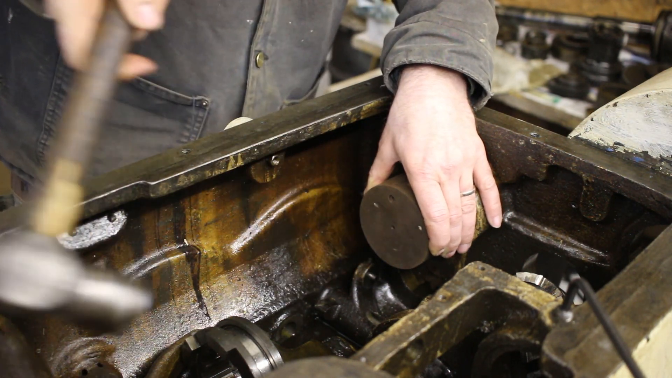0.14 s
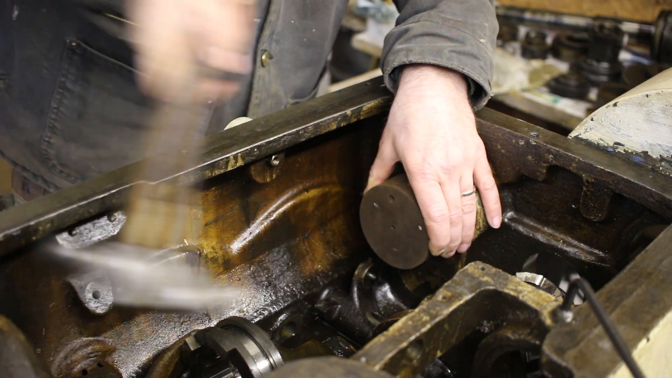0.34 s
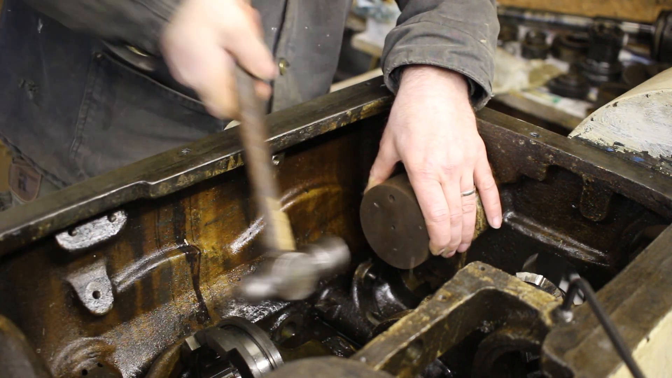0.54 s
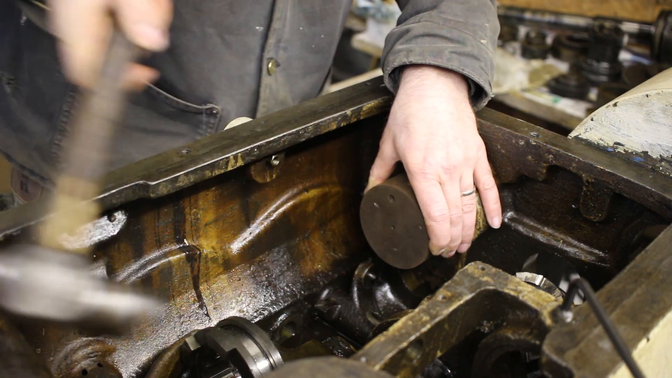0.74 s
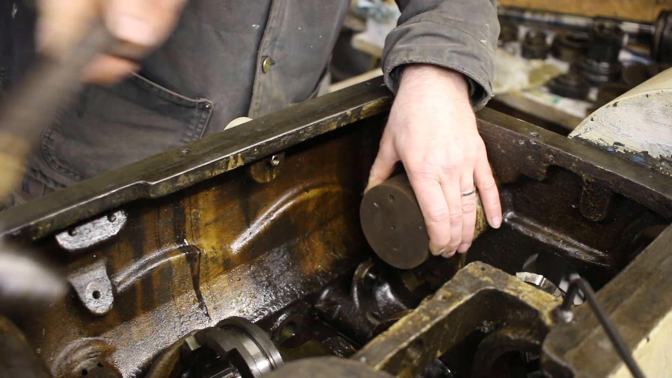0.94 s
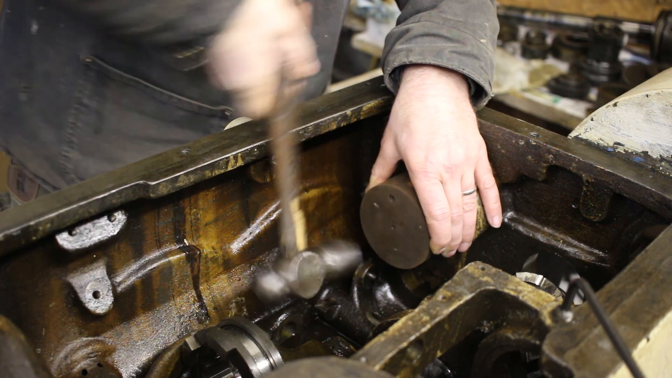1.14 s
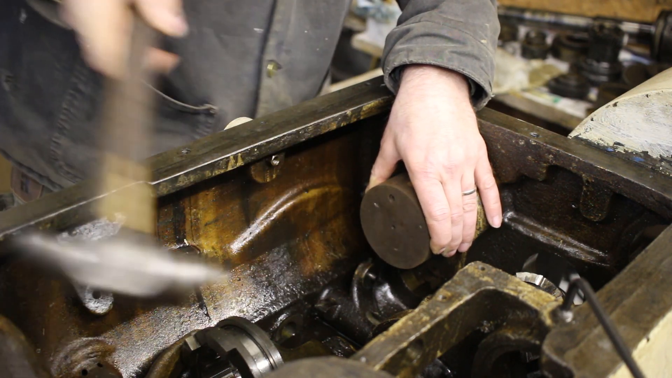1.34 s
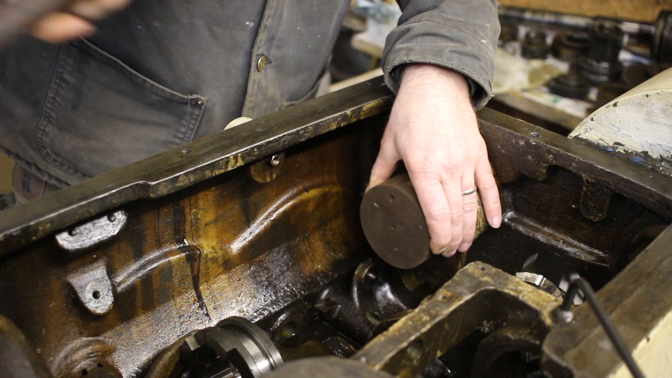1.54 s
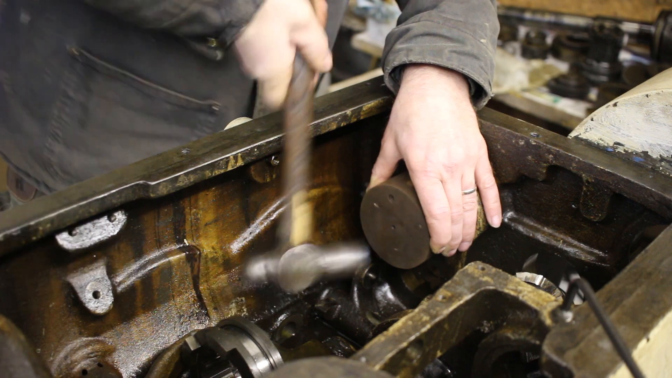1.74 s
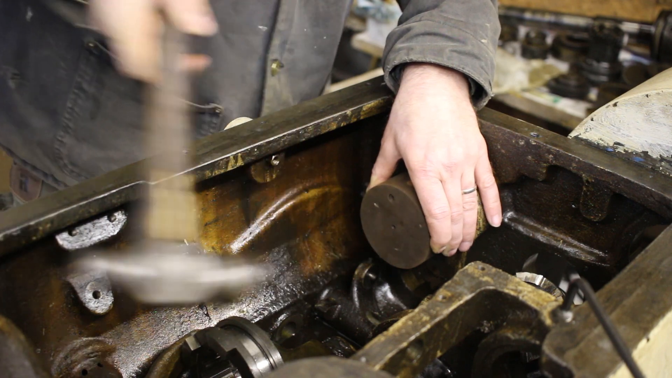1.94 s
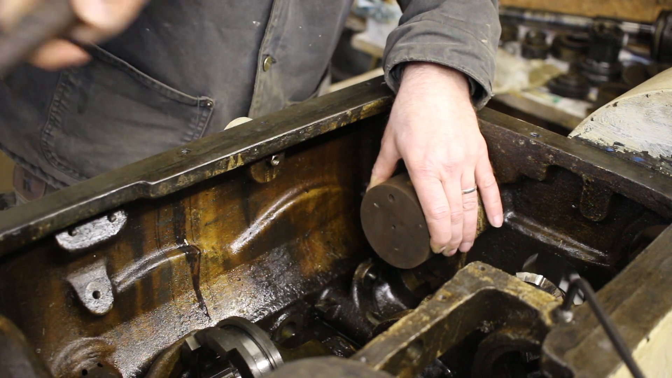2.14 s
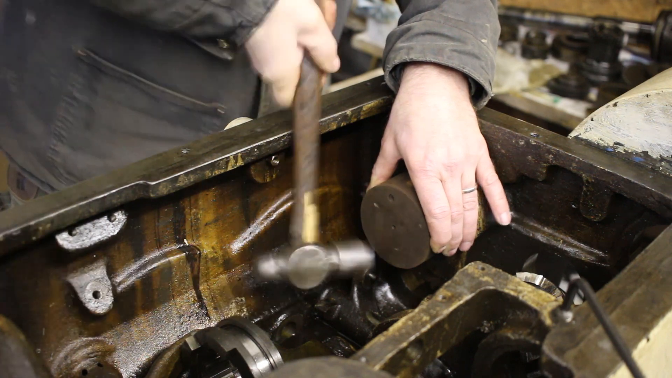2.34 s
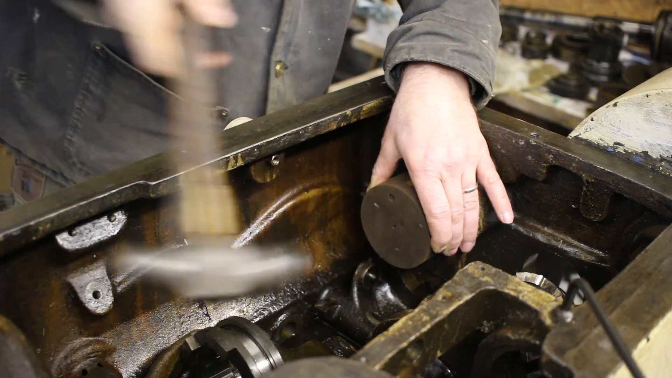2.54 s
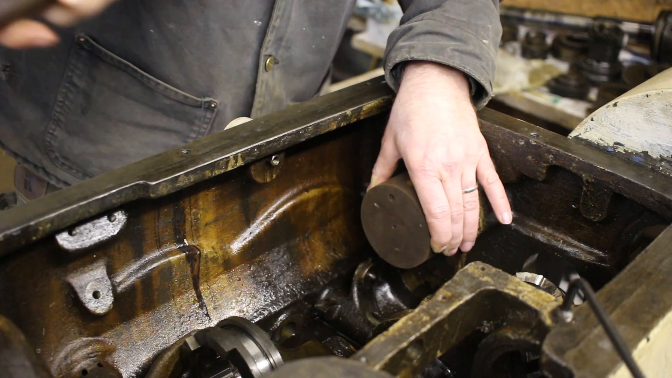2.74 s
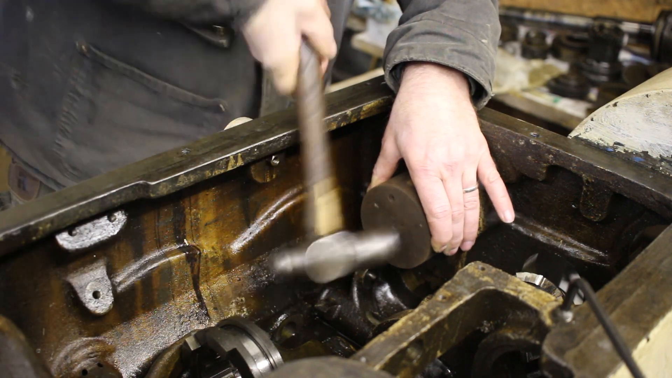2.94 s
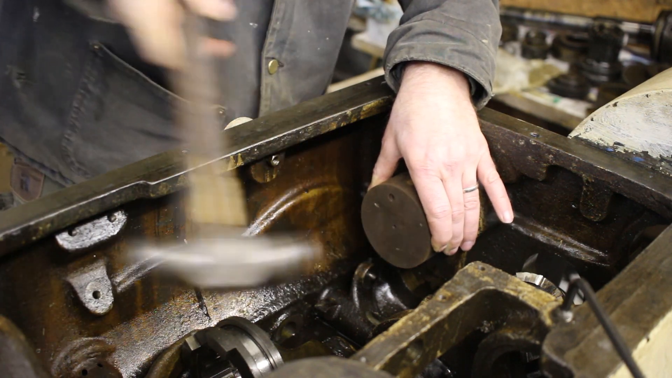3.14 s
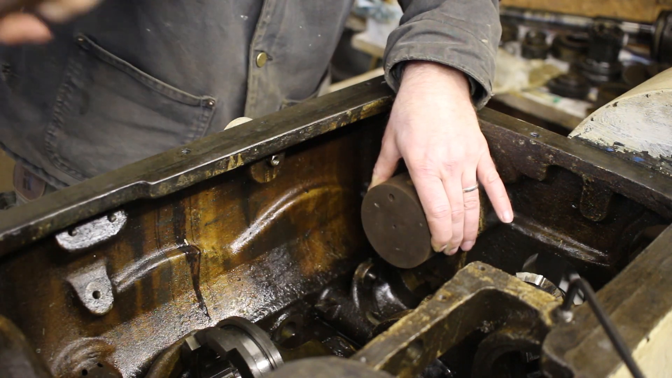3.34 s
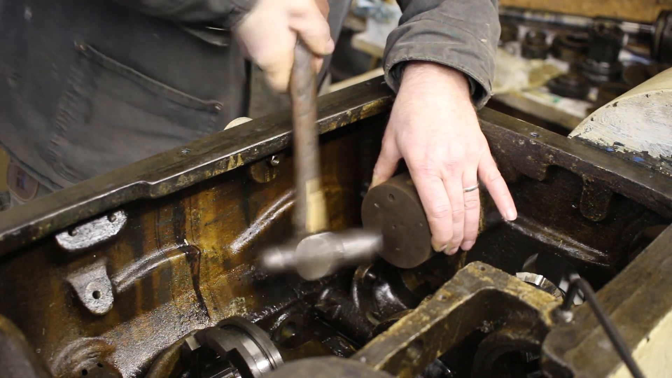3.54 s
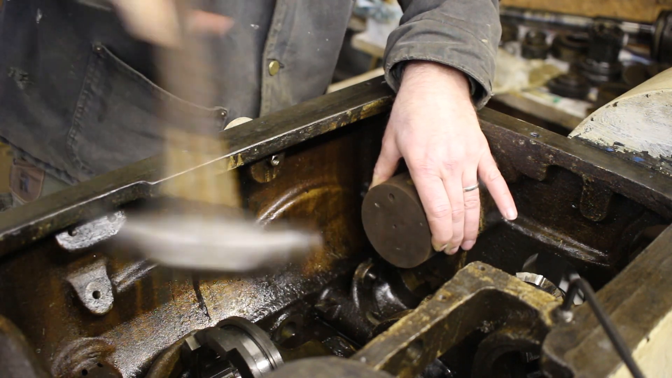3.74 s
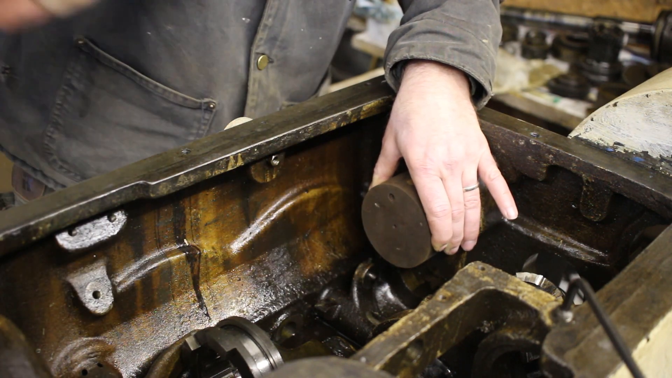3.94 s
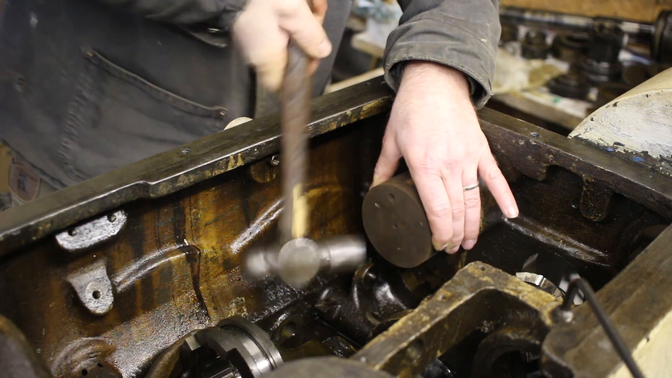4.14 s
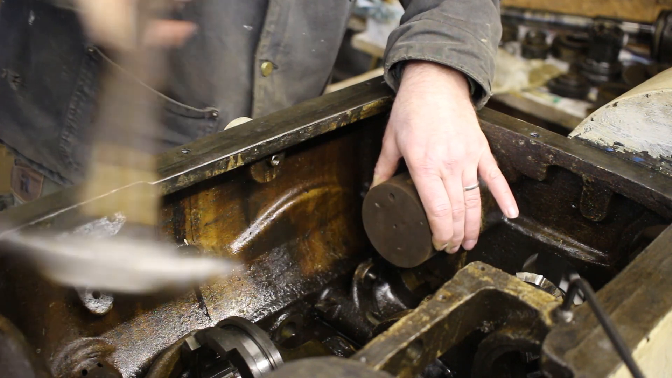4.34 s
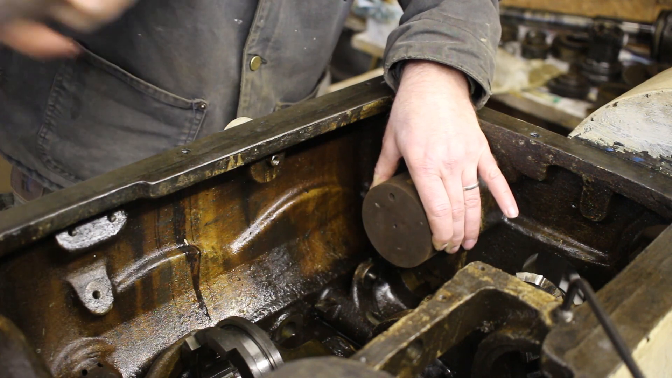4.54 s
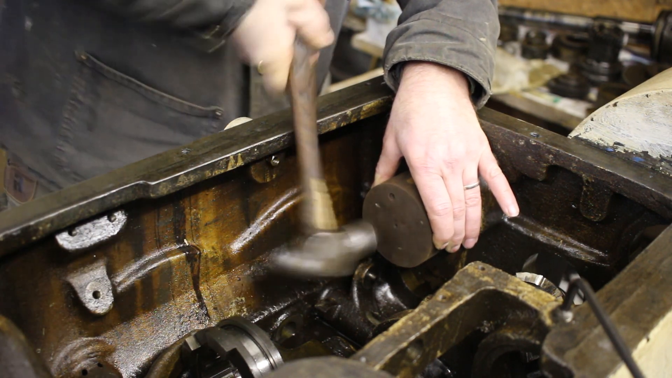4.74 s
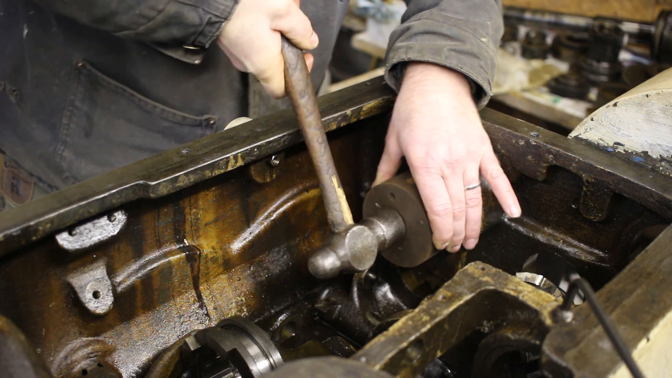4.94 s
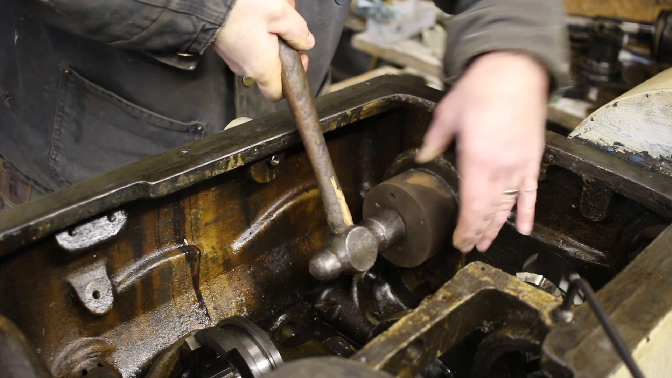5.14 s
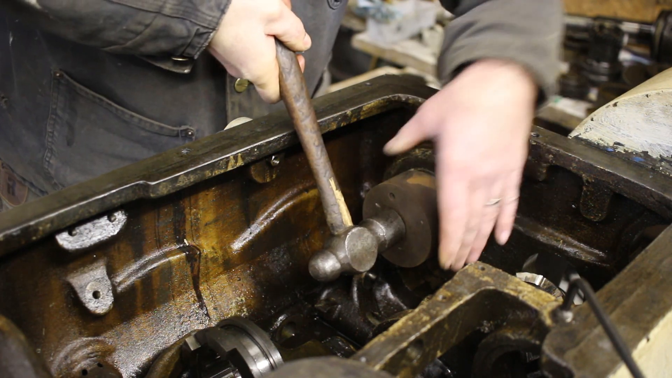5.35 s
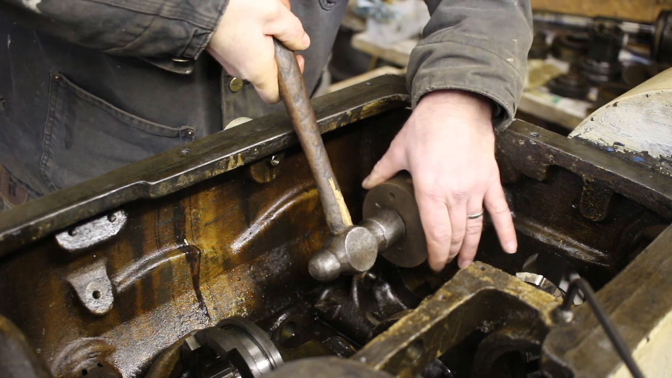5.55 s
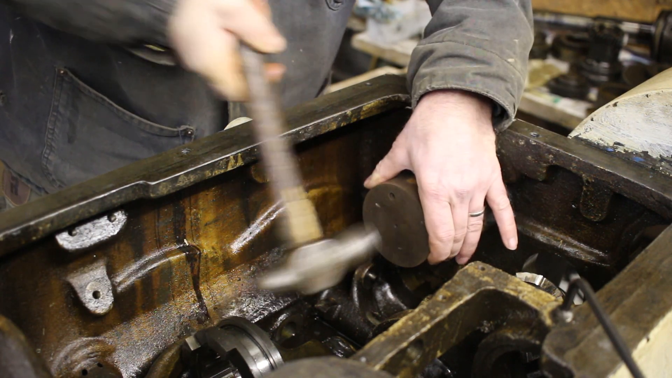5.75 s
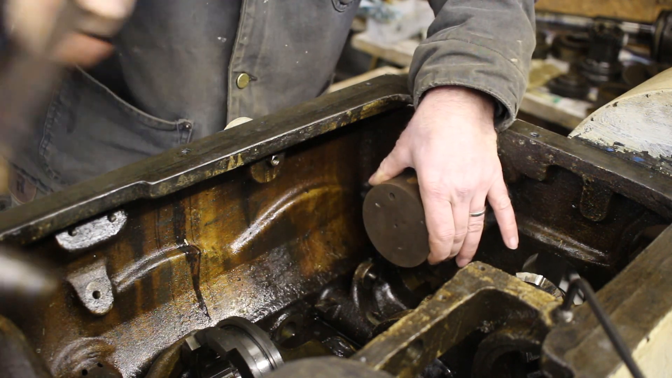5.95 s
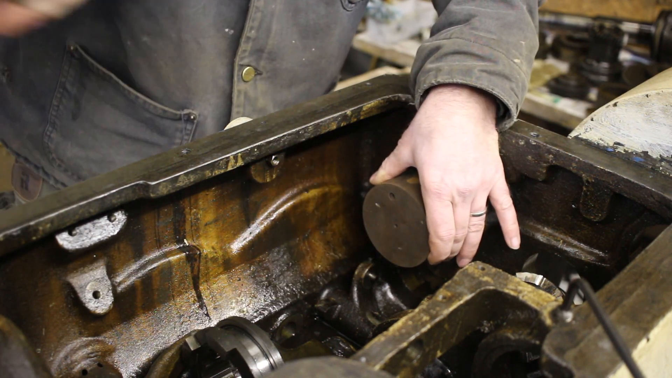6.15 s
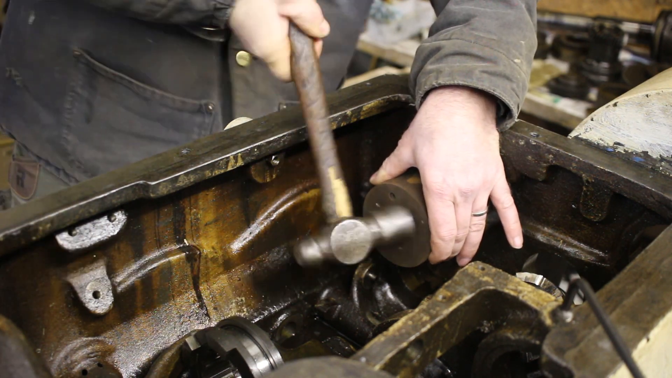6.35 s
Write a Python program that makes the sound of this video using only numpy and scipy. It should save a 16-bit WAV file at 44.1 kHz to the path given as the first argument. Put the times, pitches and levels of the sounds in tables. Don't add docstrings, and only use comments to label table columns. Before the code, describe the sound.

Evenly spaced hammer clanks ring through an iron housing with long room tails, followed by light bounces, a quiet pause and a final blow.

```python
import sys
import numpy as np
from scipy import signal
from scipy.fft import rfft, irfft, next_fast_len
from scipy.io import wavfile
from scipy.ndimage import uniform_filter1d, map_coordinates

SR = 44100
rng = np.random.default_rng(int(sys.argv[2]) if len(sys.argv) > 2 else 0)


def materialize(psi):
    bounded = np.clip(np.atleast_2d(psi).T, -1, 1)
    quanta = np.round(bounded * 32767).astype(np.int16)
    wavfile.write(sys.argv[1], SR, quanta)


def linear_from_db(decibels):
    return 10 ** (np.asarray(decibels, float) / 20)


N = 281799
LEAD = SR // 2
TAIL = 3 * SR // 2


def noise(n):
    return rng.standard_normal(n)


def unit(x):
    return x / np.sqrt(np.mean(x ** 2) + 1e-20)


def along(points, hz):
    f, value = np.transpose(points)
    return np.interp(np.log(hz + 1), np.log(f + 1), value)


def filtered(x, response):
    m = next_fast_len(len(x) + 8192)
    return irfft(rfft(x, m) * response(np.fft.rfftfreq(m, 1 / SR)), m)[:len(x)]


def coloured(n, spectrum):
    return filtered(noise(n), lambda f: linear_from_db(along(spectrum, f)))


def resonance(f, hz, width):
    return 1j * f * width / (hz * hz - f * f + 1j * f * width)


def low_pass(f, hz):
    return 1 / (1 + (f / hz) ** 6)


def ring(hz, t60, t):
    return linear_from_db(-60 * t / t60) * np.sin(2 * np.pi * (hz * t + rng.random()))


def rise(t, seconds):
    return 1 - np.exp(-t / seconds)


def wander(rate, t):
    return map_coordinates(noise(int(t[-1] * rate) + 4), [t * rate])


def silence():
    return np.zeros(LEAD + N + TAIL)


def add(track, s, sound):
    track[LEAD + round(s * SR):][:len(sound)] += sound


def trimmed(track):
    return track[LEAD:LEAD + N]


# (frequency [Hz], level [dB])
LAMP_LINES = [(118.4, -67.5), (360.7, -73), (479.1, -63.5), (597.5, -63.5), (721.4, -61), (839.8, -66.5),
              (958.2, -64), (1082, -61), (1200, -68), (1437, -75.5), (1561, -73), (2040, -77.5),
              (2159, -75.5), (2519, -76)]


def lamps():
    t = np.arange(N) / SR
    buzz = np.zeros(N)
    for hz, db in LAMP_LINES:
        harmonic = 120 * round(hz / 120)
        buzz += linear_from_db(db + 5) * np.sin(2 * np.pi * (harmonic * t + rng.random()))
    return buzz


# (frequency [Hz], level [dB per Hz])
AIR_COLOUR = [(25, -7.5), (50, -1.5), (120, -5), (500, -2.5), (700, -5), (1300, -8.5), (4000, -18),
              (9000, -26.5), (15700, -29)]


def room_air():
    return linear_from_db(-54) * unit(coloured(N, AIR_COLOUR))


# (frequency [Hz], level [dB per Hz])
TAIL_COLOUR = [(100, -33), (170, -14.5), (300, -9.5), (450, -7.5), (800, 0.5), (1200, -4.5), (2400, -8),
               (4000, -15), (6000, -21.5), (8000, -33), (10500, -40.5), (12000, -52), (14000, -66),
               (16000, -78.5)]
# (frequency [Hz], width [Hz], level over the tail [dB])
CASTING_MODES = [(482, 52, 7.5), (535, 25, 5.5), (595, 19, 4), (690, 5, 8), (798, 20, 4.5), (1054, 11, 7.5),
                 (1155, 30, 2.5), (1370, 12, 0), (1570, 20, 2), (1600, 99, 0), (2054, 24, 1),
                 (2380, 37, 1.5), (2680, 54, 2.5), (3690, 26, 4), (3770, 60, 4.5), (4160, 70, 0.5),
                 (9560, 300, 8)]
# (frequency [Hz], time to fall 60 dB [s])
TAIL_DECAY = [(60, 0.47), (200, 0.79), (700, .95), (2000, 0.82), (4500, .62), (8000, 0.39), (10000, 0.37),
              (12000, .3), (14000, 0.15), (16000, 0.2)]


def room_tail():
    def iron(f):
        modes = sum((linear_from_db(db) - 1) * resonance(f, hz, width) for hz, width, db in CASTING_MODES)
        return linear_from_db(along(TAIL_COLOUR, f)) * (1 + modes)

    hz, t, z = signal.stft(filtered(noise(TAIL), iron), SR, nperseg=256)
    early = 1 + linear_from_db(13.5 - 60 * t / 0.079)
    decay = linear_from_db(-60 * (t - 0.15) / along(TAIL_DECAY, hz)[:, None])
    fading = signal.istft(z * early * decay, SR, nperseg=256)[1][:TAIL]
    fading = fading * rise(np.arange(TAIL) / SR, 0.0066)
    return fading / np.sqrt(np.mean(fading[SR // 10:SR // 5] ** 2))


def clank(t, modes, damping, crack_db):
    body = np.zeros(len(t))
    for hz, width, db in modes:
        t60 = np.clip(damping * 6 / np.sqrt(width * hz / 40), 0.008, 0.2)
        build_up = 1 - np.exp(-t * (hz / 1000) ** 2 / 0.003)
        body += linear_from_db(db + 2 * rng.standard_normal()) * ring(hz, t60, t) * build_up
    crack = unit(filtered(noise(len(t)), lambda f: resonance(f, 2200, 990) + 0.16))
    crack = linear_from_db(crack_db - 60 * t / 0.028) * crack
    return (body + crack) * rise(t, 0.00012) / 3


# (frequency [Hz], level [dB], time to fall 60 dB [s])
HEAD_MODES = [(9080, -14, .15), (9530, -4, .2), (9800, -10, .2), (10020, -2, .14), (10110, -7, .3),
              (11500, -18, .14)]


def head_ring(t):
    head = np.zeros(len(t))
    for hz, db, t60 in HEAD_MODES:
        band = unit(filtered(noise(len(t)), lambda f: resonance(f, hz, 45)))
        head += linear_from_db(db + 2 * rng.standard_normal() - 60 * t / t60) * band
    return head * rise(t, 0.001)


# (frequency [Hz], level [dB], time to fall 60 dB [s])
PLATE_MODE = (202, -20.5, 0.77)


def plate_boom(t):
    hz, db, t60 = PLATE_MODE
    fade = np.cos(np.pi * t)
    return linear_from_db(db + rng.standard_normal()) * ring(hz, t60, t) * fade * rise(t, 0.012)


# (frequency [Hz], width [Hz], level [dB])
DRIFT_MODES = [(444, 110, -7.5), (577, 56, -6), (811, 100, -14.5), (1013, 180, -18), (1392, 120, -2),
               (1597, 150, -5.5), (1745, 100, -10.5), (2053, 68, -1.5), (2353, 84, 1.5), (2707, 170, 1.5),
               (3487, 90, -5), (3800, 85, -7.5), (4092, 81, -2), (5100, 140, -7), (5426, 180, -2),
               (5865, 59, -10), (6120, 100, -5.5), (6760, 600, -13), (9000, 150, -22.5), (10054, 110, 2.5)]
# (time [s], peak [dB], tail [dB], head ring [dB], gain drop [dB])
BLOWS = [
    (0.489, 7.5, -1, -7, 19),
    (1.154, 5, 0, 1.5, 19.5),
    (1.781, 6, -0.5, 3.5, 19),
    (2.381, 4, 0, 3, 18),
    (2.996, 1.5, 5, 8, 19),
    (3.595, 3, 2, 3.5, 18.5),
    (4.177, 3.5, 3.5, 10, 20.5),
    (4.76, 1.5, 4, 3.5, 18.5),
    (6.388, 1.5, -7, 0, 19),
]
# (time [s], peak [dB], tail [dB], head ring [dB], gain drop [dB])
EARLIER_BLOW = (-0.1935, 4.5, 3.5, -1, 21.5)


def blows():
    track, t = silence(), np.arange(SR // 2) / SR
    for s, db, tail_db, ring_db, _ in [EARLIER_BLOW, *BLOWS]:
        add(track, s + 0.0008, linear_from_db(db + 13.5) * clank(t, DRIFT_MODES, damping=0.5, crack_db=4.5))
        add(track, s + 0.002, linear_from_db(db) * plate_boom(t))
        add(track, s + 0.0042, linear_from_db(db + ring_db - 16) * head_ring(t))
        add(track, s + 0.002, linear_from_db(db + tail_db - 16) * room_tail())
    return trimmed(track)


def swell(lead_s, spectrum):
    n = round(lead_s * SR)
    growth = np.sin(np.pi / 2 * np.arange(n) / n) ** 2
    return growth * unit(coloured(SR // 8, spectrum))[:n]


# (blow time [s], lead [s], swish level [dB], puff level [dB])
SWINGS = [(.490, 0.083, -43, -51.5), (1.154, .035, -52.5, -39), (1.783, 0.072, -43.5, -37),
          (2.382, .045, -46, -29.5), (2.996, 0.049, -44, -36.5), (3.594, .035, -43, -47.5),
          (4.18, 0.028, -48, -37), (4.761, 0.059, -45, -49), (6.389, 0.095, -42.5, -41.5)]


def swings():
    swish = [(800, -20.5), (2500, 0), (5000, -2.5), (9000, -11), (14000, -17.5)]  # (Hz, dB)
    puff = [(40, -19.5), (120, 5.5), (400, 3.5), (900, -27.5), (3000, -65.5)]
    track = silence()
    for s, lead_s, swish_db, puff_db in SWINGS:
        add(track, s - lead_s, linear_from_db(swish_db) * swell(lead_s, swish))
        add(track, s - lead_s, linear_from_db(puff_db) * swell(lead_s, puff))
    return trimmed(track)


# (time [s], peak [dB], frequency [Hz], width [Hz])
TICKS = [
    (1.0685, -36, 4140, 1524),
    (5.3239, -21, 5740, 1460),
    (5.5994, -42, 5770, 1510),
    (6.1785, -34, 5850, 1510),
]


def ticks():
    track, t = silence(), np.arange(SR // 5) / SR
    for s, db, hz, width in TICKS:
        scrape = (linear_from_db(-60 * t / 0.012) + linear_from_db(-22 - 60 * t / 0.25)) * noise(len(t))

        def steel(f):
            modes = resonance(f, hz, width * 2) + 0.3 * resonance(f, hz * 1.56, 900)
            return modes * low_pass(f, 8000)

        ping = ring(hz, 0.035, t) * rise(t, 0.0005)
        add(track, s, linear_from_db(db - 1) * filtered(scrape, steel) + linear_from_db(db - 13.5) * ping)
    return trimmed(track)


# (frequency [Hz], width [Hz], level [dB])
FACE_MODES = [(1670, 200, 0), (2400, 450, 0), (3660, 290, -5), (4700, 220, -10)]
# (time [s], peak [dB])
BOUNCES = [
    (4.8529, -9.5),
    (4.9352, -12),
    (4.9854, -36),
]


def bounces():
    track, t = silence(), np.arange(SR // 2) / SR
    for s, db in BOUNCES:
        contact = clank(t, FACE_MODES + [(910, 250, -3)], damping=0.3, crack_db=1)
        soft = filtered(contact, lambda f: resonance(f, 2100, 2700) ** 2 * low_pass(f, 5000))
        add(track, s + 0.0005, linear_from_db(db + 23) * soft)
        add(track, s + 0.003, linear_from_db(db - 19) * filtered(room_tail(), lambda f: low_pass(f, 4000)))
    return trimmed(track)


# (time [s], level [dB])
RUSTLE = [
    (5.4, -70),
    (5.544, -61.5),
    (5.79, -56),
    (6.154, -61.5),
    (6.3, -59),
]


def sleeve():
    t = np.arange(N) / SR
    colour = [(300, -18), (1500, -2), (4000, -0.5), (9000, -8.5), (16000, -28)]  # (Hz, dB)
    grain = linear_from_db(1.5 * wander(30, t))
    fibre = unit(grain * coloured(N, colour))
    s, db = np.transpose(RUSTLE)
    return linear_from_db(np.interp(t, s, db, left=-120)) * fibre


# (time [s], peak [dB], edge level [dB])
KNOCKS = [
    (6.299, -38, -3),
    (6.32, -33, 0),
]


def knocks():
    track, t = silence(), np.arange(SR // 5) / SR
    for s, db, edge_db in KNOCKS:
        body = 0.66 * ring(507, 0.043, t) + ring(1100, 0.013, t)
        edge = ring(1950, 0.011, t) + ring(2620, 0.008, t) + 0.6 * ring(3500, 0.008, t)
        add(track, s, linear_from_db(db) * (body + linear_from_db(edge_db) * edge) * rise(t, 0.00044) ** 2)
    return trimmed(track)


def scene():
    hammer = blows() + swings() + bounces()
    return (lamps() + room_air() + hammer + ticks() + sleeve() + knocks())[None]


# (frequency [Hz], level [dB])
WHINE = (15750, -80)


def whine(t):
    hz, db = WHINE
    return linear_from_db(db + 3 * np.sin(2 * np.pi * 11 * t)) * np.sin(2 * np.pi * hz * t)


def ducking(t):
    gain_db = np.zeros(N)
    for s, *_, drop_db in [EARLIER_BLOW, *BLOWS]:
        since = np.maximum(t - s - 0.003, 0)
        duck_db = drop_db * rise(since, 0.0045) - 56 * since
        gain_db = np.minimum(gain_db, -duck_db)
    return uniform_filter1d(gain_db, size=64)


# (frequency [Hz], level [dB])
TREBLE_LIMIT = [(6000, -75), (8000, -60), (10300, -56), (11000, -47), (15000, -59.5), (15600, -60.5)]


def masked(x):
    hz, _, z = signal.stft(x, SR, nperseg=1024)
    power = abs(z) ** 2
    band = power[:512].reshape(64, 8, -1).sum(axis=1)
    band = np.repeat(band, 8, axis=0)
    keep = band > linear_from_db(along(TREBLE_LIMIT, hz[:512]))[:, None] ** 2 * power.sum(axis=0)
    keep = np.vstack([keep, keep[:1]])
    hz = hz[:, None]
    z = z * (keep | (hz < 6000))
    top_cut = linear_from_db(-22 * (hz > 15850))
    return signal.istft(z * top_cut * resonance(hz, 1500, 30000), SR, nperseg=1024)[1][:N]


# (blow time [s], lead [s], level [dB])
HISS_SWELLS = [(.490, .028, -33.5), (1.153, 0.038, -36.5), (1.782, 0.022, -33.5), (2.382, 0.024, -32.5),
               (2.998, 0.018, -34.5), (3.595, 0.02, -31.5), (4.176, 0.03, -33.5), (4.761, 0.034, -39),
               (6.389, 0.021, -32.5)]


def swelling_hiss():
    colour = [(300, -2.5), (2500, 3), (6000, -3), (15500, -5), (16000, -61.5)]  # (Hz, dB)
    track = silence()
    for s, lead_s, db in HISS_SWELLS:
        add(track, s - lead_s, linear_from_db(db) * swell(lead_s, colour))
    return trimmed(track)


def band_limit(x):
    return signal.sosfilt(signal.butter(12, 15840, fs=SR, output="sos"), x)


def record(dry):
    t = np.arange(N) / SR
    x = (dry[0] + whine(t)) * linear_from_db(ducking(t))
    x = masked(np.clip(x, -1, 1))
    mix = (x + swelling_hiss())[None]
    return band_limit(mix)


dry = scene()
out = record(dry)
materialize(out)
```